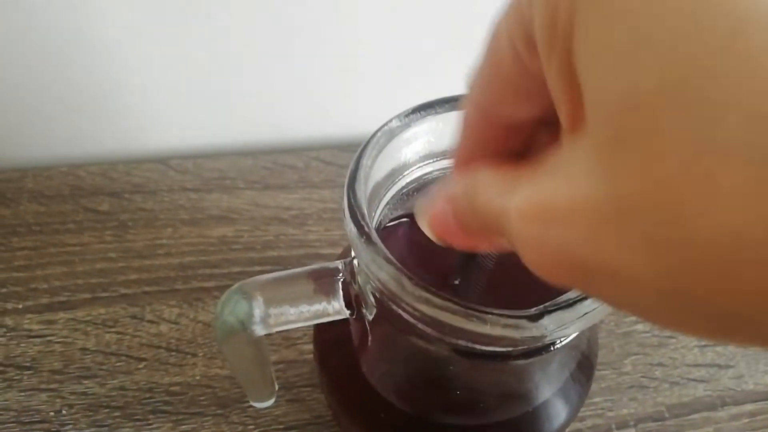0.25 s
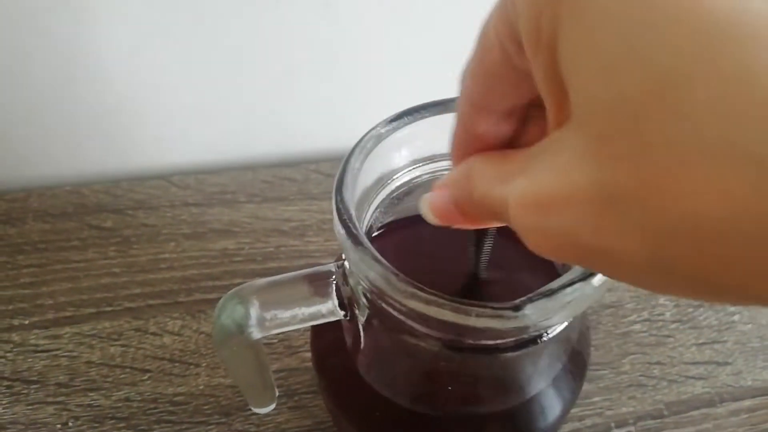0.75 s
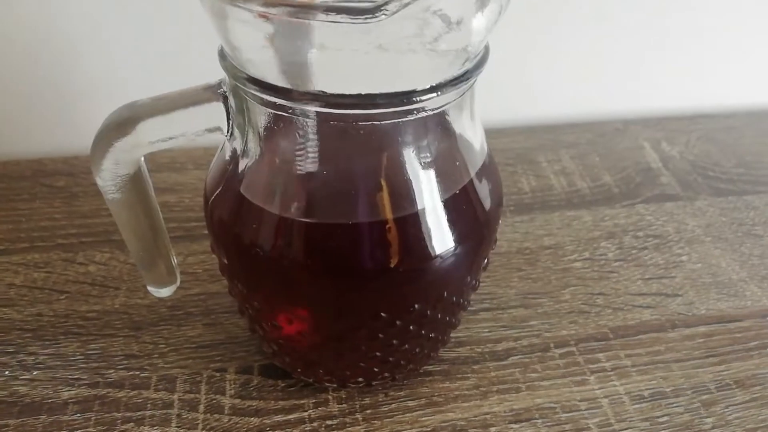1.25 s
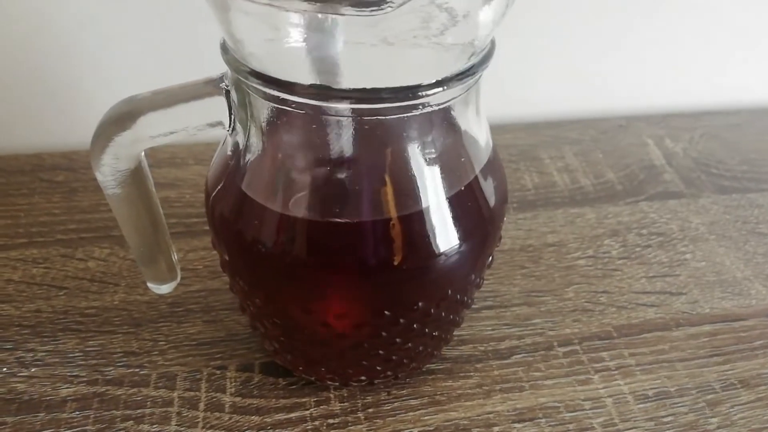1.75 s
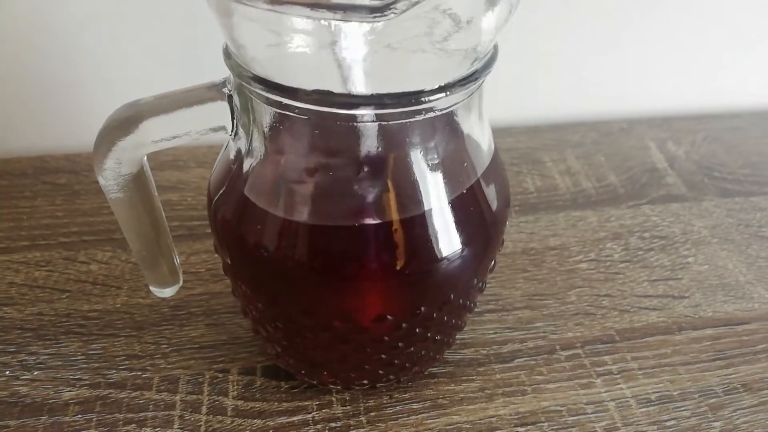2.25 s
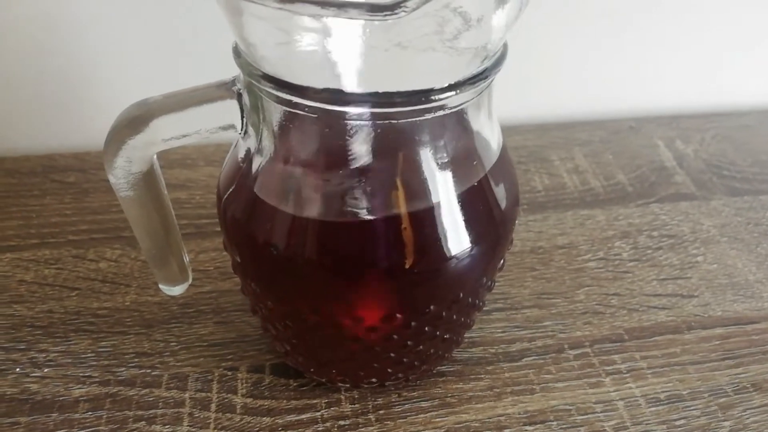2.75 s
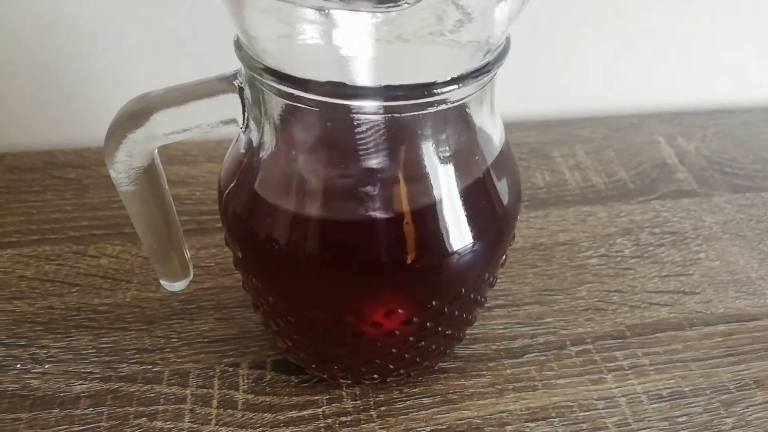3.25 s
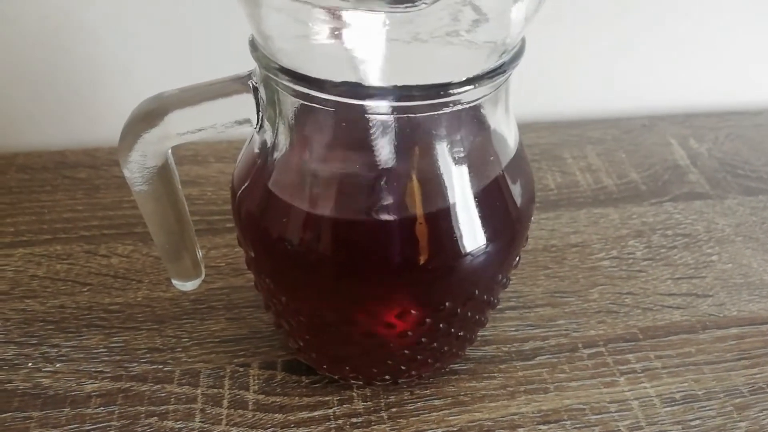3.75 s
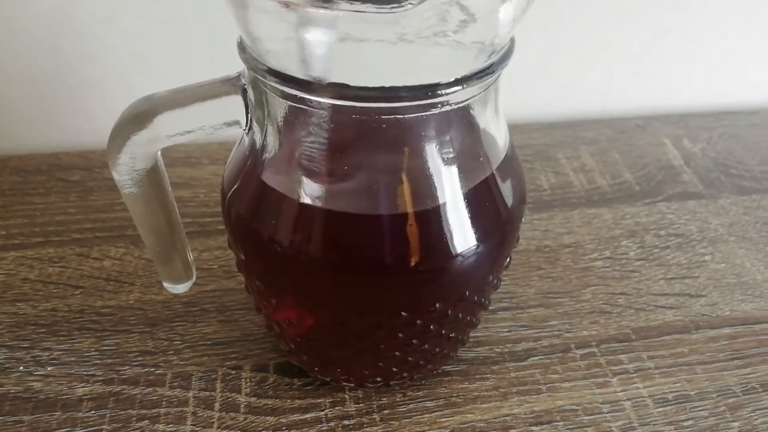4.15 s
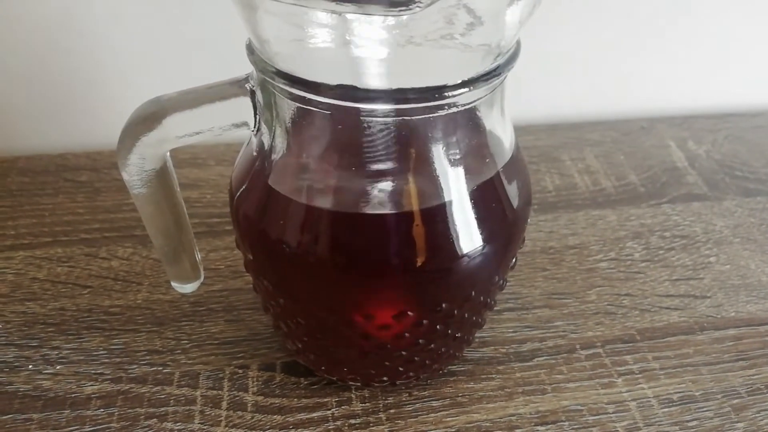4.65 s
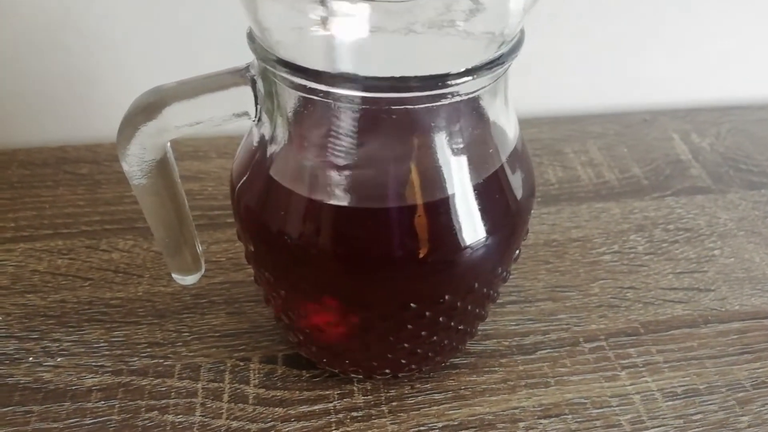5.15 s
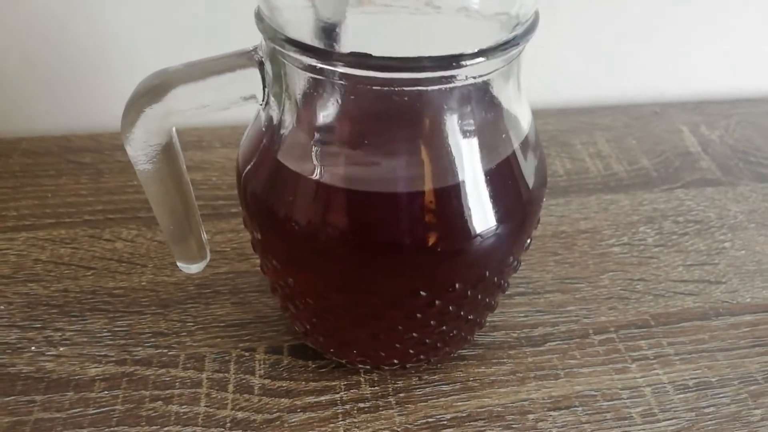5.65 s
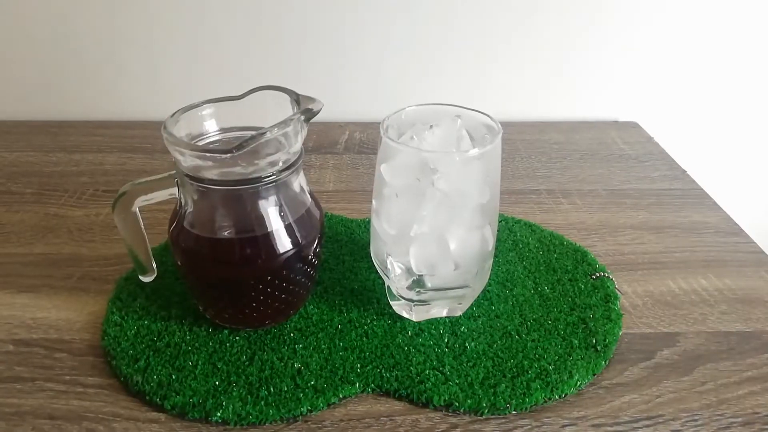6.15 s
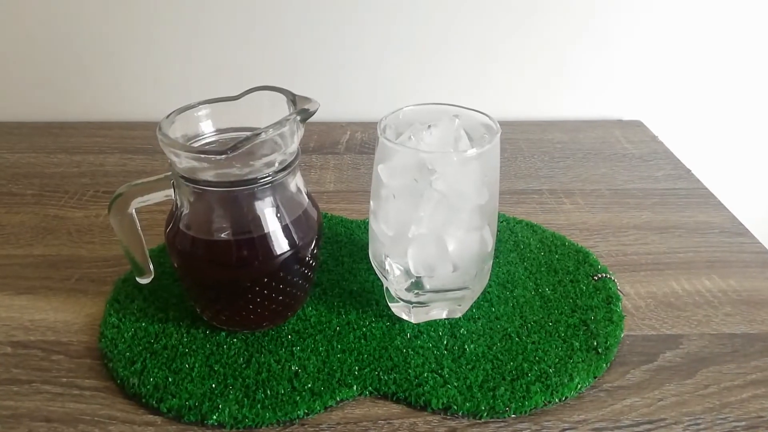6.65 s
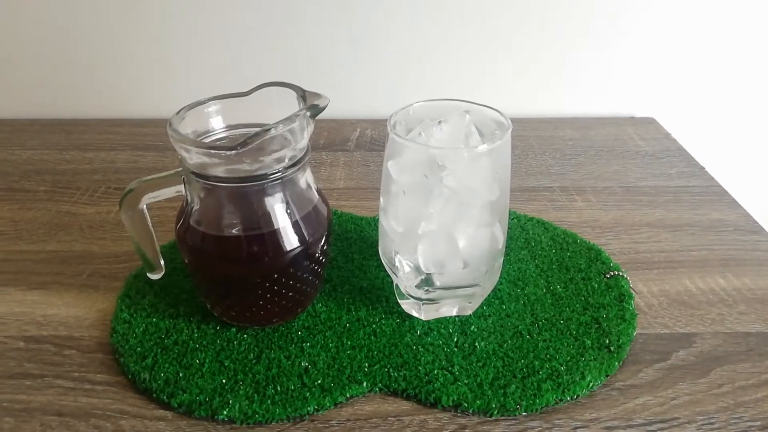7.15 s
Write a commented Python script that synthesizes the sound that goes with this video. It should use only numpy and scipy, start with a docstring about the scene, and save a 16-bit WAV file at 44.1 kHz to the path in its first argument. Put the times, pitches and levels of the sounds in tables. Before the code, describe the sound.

A small quiet room with low soft hum and thin hiss, heard by a close stereo microphone. At about 0.45 and 0.7 s a steel spoon makes two light, dry, very short ticks as it goes into a glass jug of drink. A near-silent gap follows. At 2.05 s comes a firm, bright glass clink, then a tight double one at 2.6 s with a weaker tap after it. More clinks ring at 3.6 s, loudest at 4.1 s, then 4.8 s, a quick pair at 5.1 s and a last at 5.7 s. Each has a crisp attack and a high, slightly shimmering ring fading within a fraction of a second. Between them are barely audible hissing scrapes until about 4.5 s and a faint low liquid slop near 3.2 s. Distant birds whistle and chatter very faintly, clearer from 5.3 s until the end, about 7.4 s.

```python
"""A steel spoon stirs a drink in a glass jug: decaying modes, in beating pairs, ring after each blow.
Before that it ticks as it goes in, a short damped ring; along the wall, random slips hiss and sing.
The drink loads the glass, so a low strike flattens one wall mode; a noise band makes one soft slop.
Low filtered noise hums and thin noise hisses in a small room. Faint far birds whistle and chatter:
gliding tones, blurred by pitch jitter and rasp, that arrive largely by reflection."""
import sys
import numpy as np
from scipy import signal
from scipy.fft import rfft, irfft
from scipy.io import wavfile
from scipy.ndimage import uniform_filter1d

SR = 44100
rng = np.random.default_rng(int(sys.argv[2]) if len(sys.argv) > 2 else 0)


def wav_out(sig):
    """Save sig, one row per channel (or a flat mono array), as 16-bit PCM at SR to the path in sys.argv[1]."""
    wavfile.write(sys.argv[1], SR, np.round(np.clip(np.atleast_2d(sig).T, -1, 1) * 32767).astype(np.int16))


N = 325899  # length in samples


def amp(db):
    """Amplitude ratio: 20 dB is a factor of ten."""
    return 10 ** (np.asarray(db) / 20)


def unit(x):
    """Normalization to an rms value of 1."""
    return x / np.sqrt(np.mean(x ** 2) + 1e-20)


def read(points, hz):
    """Linear interpolation of a table along a log-frequency axis."""
    f, value = np.transpose(points)
    return np.interp(np.log(hz + 1), np.log(np.maximum(f, 0) + 1), value)


def add(mix, s, sound):
    """Superposition: a sound starting at s seconds adds to the mix."""
    part = mix[:, max(round(s * SR), 0):][:, :sound.shape[-1]]
    part += sound[..., :part.shape[1]]


def colour(x, points):
    """Linear filtering: the spectrum is multiplied by the gains of a table (f/Hz, gain/dB)."""
    gain = amp(read(points, np.fft.rfftfreq(x.shape[-1], 1 / SR)))
    return irfft(rfft(x) * gain, x.shape[-1])


def noise(points, size):
    """Two uncorrelated channels of filtered noise, normalized together."""
    return unit(colour(rng.standard_normal((2, size)), points))


def decay(t, t60):
    """Exponential decay: the level falls 60 dB in t60 seconds."""
    return np.exp(-np.log(1000) * t / t60)


def random_sign(shape):
    """Equal chances of -1 and 1."""
    return rng.choice([-1, 1], shape)


def ring(hz, db, t60, pan_db, t, split, twin_db):
    """Modal decay: the body is not quite round, so each mode beats against a close twin."""
    count = len(hz)
    start = 2 * np.pi * rng.random((count, 1))
    ear_offset = np.pi * rng.uniform(1 / 8, 1 / 3, (count, 1)) * random_sign((count, 1))
    # each twin starts in step with its mode; the two channels differ in phase
    phase = start + np.array([-1, 1])[:, None, None] * ear_offset
    twin_hz = hz * (1 + split * rng.uniform(0.54, 1, count) * random_sign(count))
    waves = np.sin(2 * np.pi * np.outer(hz, t) + phase)
    waves += amp(twin_db) * np.sin(2 * np.pi * np.outer(twin_hz, t) + phase)
    sides = amp(np.array([pan_db, -pan_db]) / 2)
    sides /= np.sqrt((sides ** 2).mean(0))
    return np.einsum("cm,mt,cmt->ct", sides * amp(db), decay(t, t60[:, None]), waves)


# spectral density of the low hum: f/Hz, relative level/dB per Hz
HUM_SPECTRUM = [(12, -19), (20, -5.5), (59, -8.5), (111, -1.5), (141, -4.5), (233, -12), (265, -9.5),
                (301, -16.5), (335, -16), (367, -20.5), (498, -23), (630, -23), (702, -23), (1210, -27),
                (1500, -48), (1950, -69), (3300, -120)]
# spectral density of the thin hiss: f/Hz, relative level/dB per Hz
HISS_SPECTRUM = [(880, -23), (1500, -0.5), (2310, -3), (3110, -3), (3470, -1.5), (4390, -0.5), (5090, -4.5),
                 (8580, -1.5), (14900, -9.5), (15800, -8.5)]
# likeness of the two channels: f/Hz, correlation (0-1)
EAR_LIKENESS = [(100, 1), (300, 1), (600, 0.98), (1200, 0.99), (3000, 0.86), (8000, 0.84), (13000, 1)]
HUM_DB, HISS_DB = -55, -68.5  # rms levels


def room_noise():
    """Stationary noise: correlation between the ears, set by frequency, makes hum central and hiss wider."""
    hz = np.fft.rfftfreq(N, 1 / SR)
    same = np.clip(read(EAR_LIKENESS, hz), -1, 1)
    mid, side = rfft(rng.standard_normal((2, N))) * np.sqrt([1 + same, 1 - same])
    air = irfft(np.array([mid + side, mid - side]), N)
    hum = amp(HUM_DB) * unit(colour(air, HUM_SPECTRUM))
    hiss = amp(HISS_DB) * unit(colour(air, HISS_SPECTRUM))
    return hum + hiss


def bird_note(start_hz, length, glide, rough, waver=0.131, overtone_db=-6, rasp_db=-3):
    """Frequency modulation: a gliding whistle with two overtones; jitter and wide rasp blur harsh notes."""
    size, rough = int(length * SR), np.clip(rough, 0, 1)
    jitter = unit(uniform_filter1d(rng.standard_normal(size), size=30))
    pitch_hz = np.geomspace(start_hz, start_hz * glide, size) * (1 + waver * rough * jitter)
    phase = 2 * np.pi * np.cumsum(pitch_hz) / SR
    overtones = np.sin(2 * phase) + np.sin(3 * phase)
    whistle = unit(np.sin(phase) + amp(overtone_db) * np.sqrt(rough) * overtones)
    rasp_bands = [(1500, -57), (2700, 24), (5500, -9), (7700, 17), (10500, 18), (13000, -42)]
    rasp = noise(rasp_bands, size)
    voice = np.sqrt(1 - rough / 2) * whistle + amp(rasp_db) * np.sqrt(rough / 2) * rasp
    # distance takes the top off
    return colour(voice * signal.windows.tukey(size, .5), [(10500, 0.5), (13000, -23)])


# rising whistles: t/s, start f/Hz, level before distance/dB
RISING_CALLS = [(.381, 3870, -65.5), (5.378, 3850, -63.5)]
# sharp falling notes: t/s, start f/Hz, level before distance/dB
SHARP_CALLS = [(2.809, 5800, -62), (4.59, 6480, -62.5), (5.369, 6470, -59), (6.2, 6400, -60),
               (6.635, 6520, -61)]
# one long faint whistle: t/s, start f/Hz, level before distance/dB
LONG_CALL = [(2.805, 2120, -81)]
# shape of each kind of note: length/s, end pitch / start pitch, roughness (0-1)
SLUR_NOTE, RISE_NOTE = (.064, .925, .06), (.165, 1.5, 0.092)
SHARP_NOTE, LONG_NOTE = (.036, .82, 0.14), (1.36, 0.97, .25)
# soft falling slurs, evenly spaced; pitch and level before distance vary a little about these centres
SLURS, SLUR_START_S, SLUR_EVERY_S, SLUR_HZ, SLUR_DB = 5, 3.705, .396, 3740, -60.5
SLUR_SCATTER_OCTAVES, SLUR_SCATTER_DB = .012, 1.5


def whistles():
    """Tonal calls: each kind of note keeps one glide and roughness."""
    out = np.zeros((2, N))
    slurs = []
    for k, (higher, louder) in enumerate(rng.standard_normal((SLURS, 2))):
        start_hz = SLUR_HZ * 2 ** (SLUR_SCATTER_OCTAVES * higher)
        slurs.append((SLUR_START_S + k * SLUR_EVERY_S, start_hz, SLUR_DB + SLUR_SCATTER_DB * louder))
    kinds = [(SLUR_NOTE, slurs), (RISE_NOTE, RISING_CALLS), (SHARP_NOTE, SHARP_CALLS), (LONG_NOTE, LONG_CALL)]
    for shape, calls in kinds:
        for s, start_hz, level_db in calls:
            add(out, s, amp(level_db) * bird_note(start_hz, *shape))
    return out


# reverberation time of the room: f/Hz, t60/s
ROOM_DECAY = [(600, 1), (3000, 0.51), (8000, 0.37), (14000, 0.48)]


def room(x, build_s=0.00073):
    """Reverberation: dense reflections, first from table and near wall; each band decays at its own rate."""
    first_echo_s = .003
    hz, t, bands = signal.stft(rng.standard_normal((2, SR // 2)), SR, nperseg=256)
    tail = signal.istft(bands * decay(t, read(ROOM_DECAY, hz)[:, None]), SR)[1]
    since = np.maximum(np.arange(tail.shape[1]) / SR - first_echo_s, 0)
    tail *= 1 - np.exp(-since / build_s)
    return signal.fftconvolve(x, tail / np.linalg.norm(tail[0]), axes=1)[:, :N]


# modes of the held spoon: f/Hz, relative level/dB, t60/s, left-right difference/dB
SPOON_MODES = [(1016, -2, 0.031, 8), (2860, -13, 0.13, 7), (3870, -21, 0.079, -9), (5240, -15.5, 0.085, 3),
               (5710, -10, 0.063, 14), (6330, -34, .07, 13), (7300, -17, .08, 7), (7500, -28, 0.054, 11),
               (8770, -7.5, .06, 13), (9300, -8.5, 0.086, -2), (9000, -31, .06, -13), (10200, -21, .07, 12),
               (10800, -15, 0.099, -10), (11700, -23, .07, -5)]
# dense resonances of spoon and glass, also used in clinks: f/Hz, relative level/dB per Hz
CLASH_SPECTRUM = [(300, -14.5), (700, -7.5), (1400, -10), (2200, -13), (4700, -7.5), (5300, -13),
                  (5950, -9), (6600, 10.5), (7350, -12), (8300, 9.5), (10400, -0.5), (11500, -8),
                  (12800, -2), (15500, -49)]
# the spoon going in: t/s, strength/dB, spectral tilt/dB per octave
ENTRY_TICKS = [(0.436, -49, 11), (0.4471, -33.2, 0.5), (0.703, -44, 4), (0.712, -32, 2.6), (.575, -60, 6),
               (.925, -64, 14)]


def ticks(clash_db=-3, clash_t60=0.044, clash_pan_db=2.0):
    """Damped modal response: the held spoon rings only briefly, with a short noisy clash."""
    out, t = np.zeros((2, N)), np.arange(SR // 4) / SR
    onset = 1 - np.exp(-t / 0.00025)
    clash_pan = amp([[clash_pan_db], [-clash_pan_db]])
    hz, db, t60, pan_db = np.transpose(SPOON_MODES)
    for s, strength_db, tilt_db in ENTRY_TICKS:
        tilted_db = db + tilt_db * np.log2(hz / np.median(hz))
        steel = ring(hz, tilted_db, t60, pan_db, t, split=0.0099, twin_db=-29)
        clash = noise(CLASH_SPECTRUM, len(t)) * decay(t, clash_t60) * clash_pan
        add(out, s, amp(strength_db) * (steel + amp(clash_db) * clash) * onset)
    return out


# bouts of harsh chatter: t/s, length/s, central start f/Hz, starting level before distance/dB
CHATTER_BOUTS = [(.89, .3, 4590, -68.5), (2.273, .08, 4430, -65), (3.943, 0.099, 4600, -67.5),
                 (5.32, .3, 3130, -63.5), (5.929, .08, 3095, -60.5), (6, 0.048, 4650, -65),
                 (6.157, .2, 5050, -63.3), (6.254, 0.27, 3070, -66.5), (6.58, 0.19, 4750, -64),
                 (6.58, .26, 3055, -67.5)]
# notes of a bout: spacing, length, fall in pitch, roughness (0-1), fading of the bout
NOTE_EVERY_S, NOTE_S, FALL_OCTAVES, ROUGHNESS, FADE_DB_PER_S = .036, .042, 0.139, .45, 17
NOTE_SCATTER_OCTAVES, NOTE_SCATTER_DB = .1, 2.5


def chatter():
    """Pulse trains: quick harsh falling notes, scattered about one pitch, fade along each bout."""
    out = np.zeros((2, N))
    for s, length, pitch_hz, level_db in CHATTER_BOUTS:
        notes = max(round(length / NOTE_EVERY_S), 1)
        for since in NOTE_EVERY_S * np.arange(notes):
            higher, louder = rng.standard_normal(2)
            start_hz = pitch_hz * 2 ** (NOTE_SCATTER_OCTAVES * higher)
            note = bird_note(start_hz, NOTE_S, 2 ** -FALL_OCTAVES, ROUGHNESS)
            note_db = level_db + NOTE_SCATTER_DB * louder - FADE_DB_PER_S * since
            add(out, s + since, amp(note_db) * note)
    return out


def rattle(hz, db, t, t60, width_hz):
    """Random excitation: the spoon's buzz on the wall drives the modes, widening each into a narrow band."""
    f = np.fft.rfftfreq(len(t), 1 / SR)
    resonance = 1 / (1 + ((f - hz[:, None]) / width_hz) ** 2) ** 2
    power = (amp(db)[:, None] ** 2 * resonance).sum(0)
    buzz = unit(irfft(rfft(rng.standard_normal((2, len(t)))) * np.sqrt(power), len(t)))
    return np.linalg.norm(amp(db)) * buzz * decay(t, t60)


# modes of the filled jug, also used in scrapes: f before any retuning/Hz, relative level/dB, free t60/s,
# left-right difference/dB, gain per unit of strike height/dB, gain per unit of strike side/dB
JUG_MODES = [(694, -37, 0.22, 9, 0, 0), (1360, -38, 0.22, -4, 0, 0), (1808, -39, 0.22, 0, 0, 0),
             (2842, -23, 0.44, -8, 1, 1), (3913, -32, 0.36, 2, 1, -8), (4435, -36, 0.36, 2, 1, -9),
             (5189, -9, 0.19, 10, 0, 3), (5507, -29, 0.26, 4, 1, 3), (5711, -21, 0.42, -3, 8, 7),
             (6274, -24, 0.34, 1, 8, 2), (6333, -29, 0.4, -5, 3, 1), (6546, -18, 0.36, 1, 1, 7),
             (6785, -16, 0.26, 3, -4, -3), (7749, -23, 0.22, 1, 10, -2), (8166, -15, 0.21, -4, 5, -7),
             (8276, -14, 0.22, -7, 5, 3), (8403, -16, 0.22, -7, -6, 8), (8591, -21, 0.22, 8, -1, -3),
             (8909, -25, 0.22, 1, 4, 8), (9076, -25, 0.21, 3, -5, -2), (9401, -29, 0.21, 7, 2, -16),
             (9663, -25, 0.21, 5, 0, 5), (9972, -19, 0.22, 5, 0, 2), (10395, -28, 0.24, 5, -1, 12),
             (10459, -28, 0.24, -3, 3, 12), (10863, -24, 0.25, -6, -1, 14), (11027, -31, 0.26, -7, 8, 2),
             (12115, -36, 0.23, -5, -1, -4), (12631, -30, 0.23, -2, 3, 7), (14411, -41, 0.22, 1, 0, 9)]
# spoon against glass: t/s, strength/dB, strike height (about -1..1), strike side (about -1..1),
# brightness/dB per octave, extra level around the wall mode/dB, extra level of the belly mode/dB
GLASS_BLOWS = [(1.292, -53, 0.51, -0.06, -3, 0, 0), (2.05, -14.5, -0.73, 0.024, .5, -1, 1),
               (2.591, -21.5, -1.22, 0.55, 3, -1, -6), (2.594, -18.5, -1.13, .15, .8, 2, -2.5),
               (2.656, -29, 0.37, .04, -5, 1, -4.5), (2.761, -42, .8, -.5, -1, -1, -6),
               (3.135, -53, 0.43, 0.46, .3, 1.5, -2), (3.332, -45.5, -0.41, -1.46, 3, -2, 0),
               (3.633, -17.5, 0.65, -.25, -0.5, -.5, -3), (4.076, -10.8, -1.15, -.2, 2.8, -2.5, -0.5),
               (4.245, -45.5, .76, -0.63, -7, -6, 4), (4.638, -46.5, .2, 0.2, -3, -6, -3),
               (4.7761, -32, 0.0074, -1.1, 2, -10, -6), (4.819, -18.5, 0.68, -0.013, -3, -11, 2.5),
               (5.0861, -21, -0.45, 0.17, -0.8, 1.5, 1.5), (5.134, -23.5, 0.34, 0.38, -3, 6, -8),
               (5.723, -17.5, -0.81, .2, .5, 2.5, 1.5)]
# spectrum of a blow, tilted by its brightness about PIVOT_HZ: f/Hz, level/dB
BLOW_SPECTRUM = [(1400, -5.5), (2840, -4.5), (5200, -2), (5700, -2.5), (6550, -1.5), (8200, 0), (10000, 0),
                 (13000, -4.5)]
PIVOT_HZ = 7000
# rows of JUG_MODES: the mode that the drink retunes, and the mode in which the whole belly rings
WALL_MODE, BELLY_MODE = 6, 3
# the wall mode's shift at mid height and per unit of height; width of the region that swells with it
WALL_SHIFT_HZ, WALL_HZ_PER_HEIGHT, WALL_WIDTH_HZ = 20.4, 36, 650
# share of the free ring time left after a blow of FIRM_DB at mid height; doubles LIGHT_DB softer
FIRM_RING, FIRM_DB, LIGHT_DB, RING_OCTAVES_PER_HEIGHT = .76, -16.5, 75, 0.14
BELLY_DAMPING = 0.46  # how much of the spoon's damping reaches the belly mode (0-1)


def clinks(glass_db=-1, rattle_db=-6, crack_db=-20, crack_s=0.0019, sparkle_db=-32):
    """Impact excitation: each blow gives a crack, a rattle and clash, and the long modal ring of the jug."""
    out, t = np.zeros((2, N)), np.arange(16384) / SR
    clash_db, clash_t60, rattle_t60, skirt_hz = -16, 0.1839, .075, 55
    twin_db, sparkle_t60 = -7, .18
    first_touch, growth_s = .25, .0028
    crack_bands = [(500, -9.0), (3000, 3.5), (9000, 5.5), (16000, 5)]
    hz, db, t60, pan_db, height_db, side_db = np.transpose(JUG_MODES)
    # the sparkle: a crowd of weak high modes, with the same pitches for every blow
    high_hz = np.linspace(11850, 15150, 11) + rng.uniform(-80, 80, 11)
    high_db = sparkle_db - 22 * np.log2(high_hz / high_hz[0])
    high_pan_db = 4 * rng.standard_normal(len(high_hz))
    high_t60 = np.full(len(high_hz), sparkle_t60)
    wall, belly = np.arange(len(hz)) == WALL_MODE, np.arange(len(hz)) == BELLY_MODE
    near_wall = np.exp(-((hz - hz[wall]) / WALL_WIDTH_HZ) ** 2)
    # the spoon chatters on the wall for a moment, so the ring keeps growing after the first touch
    swell = 1 - (1 - first_touch) * np.exp(-t / growth_s)
    fade = np.minimum(1, (t[-1] - t) * 10)
    for s, strength_db, height, side, bright_db, wall_db, belly_db in GLASS_BLOWS:
        blow = [(f, level_db + bright_db * np.log2(f / PIVOT_HZ)) for f, level_db in BLOW_SPECTRUM]
        # the drink loads the wall: the lower the strike, the flatter the wall mode
        tuned_hz = hz + wall * (WALL_SHIFT_HZ + WALL_HZ_PER_HEIGHT * height)
        # each mode grows louder or softer steadily, in dB, with strike height and side
        struck_db = db + height * height_db + side * side_db + read(blow, hz)
        struck_db = struck_db + near_wall * wall_db + belly * belly_db
        # after a firm or low blow the spoon stays on the wall and shortens the ring
        ring_octaves = (FIRM_DB - strength_db) / LIGHT_DB + RING_OCTAVES_PER_HEIGHT * height
        ring_time = FIRM_RING * 2 ** ring_octaves
        damped_t60 = t60 * ring_time ** np.where(belly, BELLY_DAMPING, 1)
        glass = amp(glass_db) * ring(tuned_hz, struck_db, damped_t60, pan_db, t, split=0.0046, twin_db=twin_db)
        glass += amp(rattle_db) * rattle(tuned_hz, struck_db, t, rattle_t60, skirt_hz)
        sparkle_level_db = high_db + read(blow, high_hz)
        glass += ring(high_hz, sparkle_level_db, high_t60, high_pan_db, t, split=0.0028, twin_db=twin_db)
        clash = colour(noise(CLASH_SPECTRUM, len(t)), blow) * decay(t, clash_t60)
        crack = noise(crack_bands, len(t)) * np.exp(-t / crack_s)
        impact = swell * (glass + amp(clash_db) * clash) + amp(crack_db) * crack
        add(out, s, amp(strength_db) * fade * impact)
    return out


# pressure of the spoon on the wall, interpolated in time: t/s, scrape level/dB
WALL_PRESSURE = [(1.75, -69.5), (2.74, -66.5), (3.24, -72), (4.24, -71)]
# stirring: start of the first scrape, time for one turn, time on the wall in each turn
TURNS, STIR_START_S, TURN_S, SCRAPE_S = 6, 1.75, .497, .3


def scrapes(slips_per_s=500, glass_db=-5):
    """Frictional excitation: in every turn, tiny random slips hiss and keep the upper modes faintly singing."""
    out, t = np.zeros((2, N)), np.arange(SR // 4) / SR
    hz, db, t60, pan_db, *_ = np.transpose(JUG_MODES)
    glass = ring(hz, db, t60, pan_db, t, split=0.0049, twin_db=-21)
    rub = [(3000, -3.5), (5500, 0), (7500, 6), (9000, 14), (11000, -8), (15000, -57)]
    size = int(SCRAPE_S * SR)
    for s in STIR_START_S + TURN_S * np.arange(TURNS):
        level_db = np.interp(s, *np.transpose(WALL_PRESSURE))
        slips = rng.standard_normal(size) * (rng.random(size) < slips_per_s / SR)
        driven_glass = signal.fftconvolve(slips[None], glass, axes=1)[:, :size]
        singing = unit(colour(driven_glass, rub))
        scrape = noise(rub, size) + amp(glass_db) * singing
        add(out, s, amp(level_db) * scrape * signal.windows.tukey(size, .5))
    return out


def swirl(s=3.17, length=0.12, level_db=-63):
    """Band-limited noise: one soft, low slop of the drink, alike in both channels."""
    out, size = np.zeros((2, N)), int(length * SR)
    slop = noise([(200, -32), (330, -6), (560, -10), (800, -18), (2000, -62)], size)[0]
    add(out, s, amp(level_db) * slop * np.hanning(size))
    return out


def scene(near_room_db=-10, tick_room_db=-14, bird_direct_db=-6, bird_room_db=-2):
    """Direct and reverberant sound: the jug is near and fairly dry, the birds largely reflected."""
    birds = whistles() + chatter()
    spoon = ticks()
    jug = clinks() + scrapes() + swirl()
    reflected = room(amp(near_room_db) * jug + amp(tick_room_db) * spoon + amp(bird_room_db) * birds)
    return jug + spoon + amp(bird_direct_db) * birds + reflected + room_noise()


EDGE_HZ = 15800


def record(dry):
    """Band limitation: a linear-phase low-pass filter removes what lies above EDGE_HZ."""
    low_pass = signal.firwin(511, EDGE_HZ, window=("kaiser", 9), fs=SR)
    return signal.oaconvolve(dry, low_pass[None], "same")


dry = scene()
out = record(dry)
wav_out(out)
```